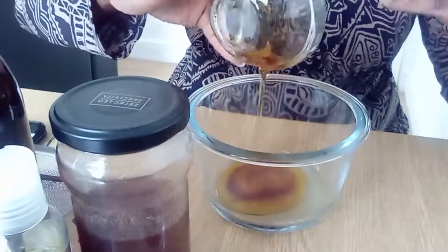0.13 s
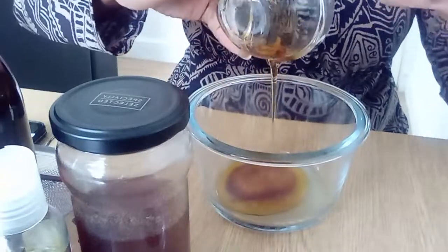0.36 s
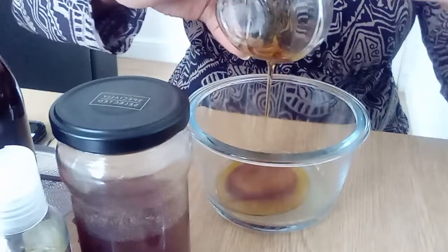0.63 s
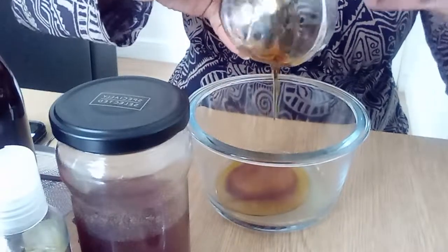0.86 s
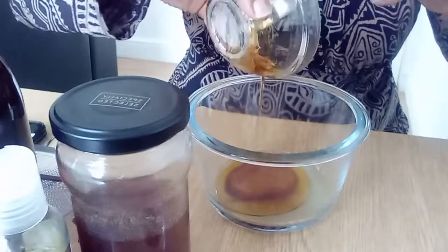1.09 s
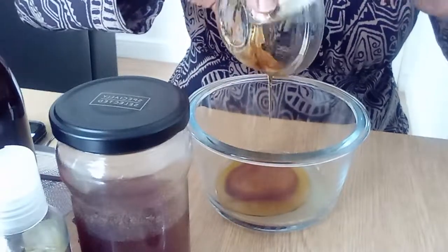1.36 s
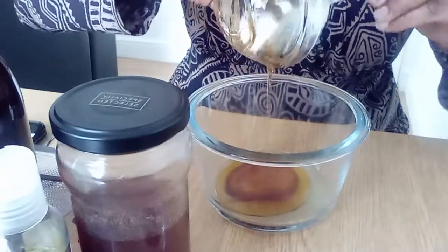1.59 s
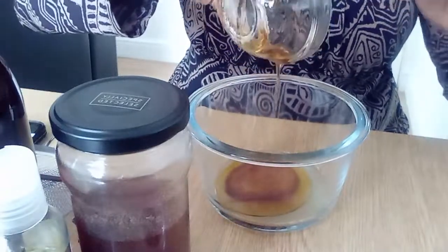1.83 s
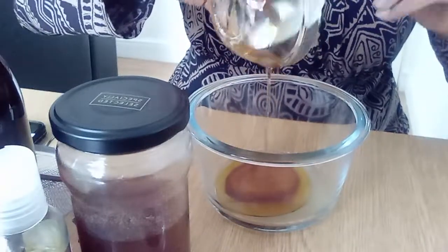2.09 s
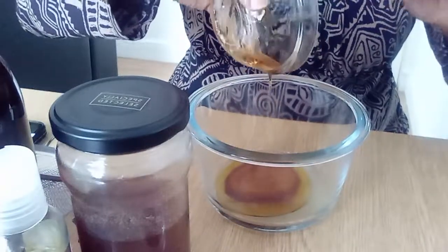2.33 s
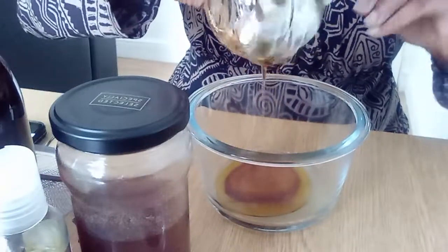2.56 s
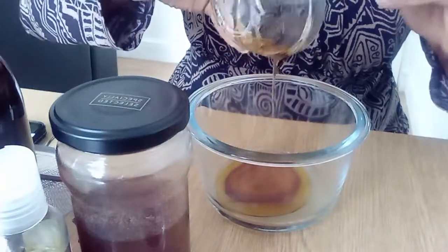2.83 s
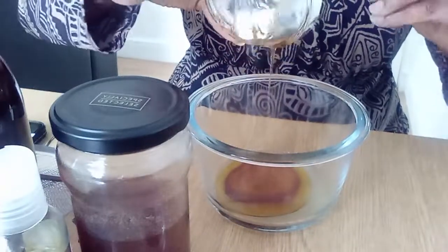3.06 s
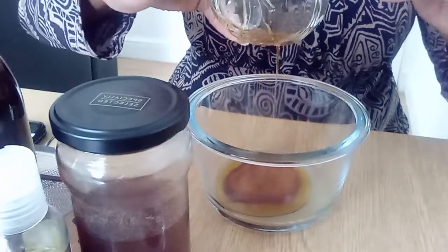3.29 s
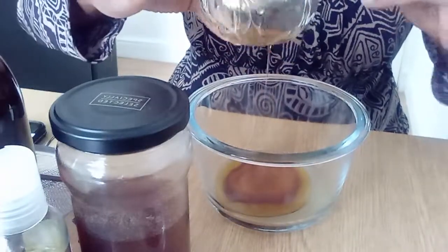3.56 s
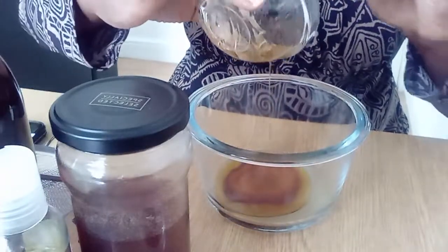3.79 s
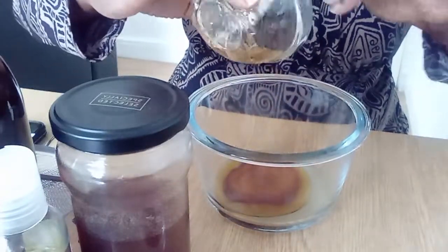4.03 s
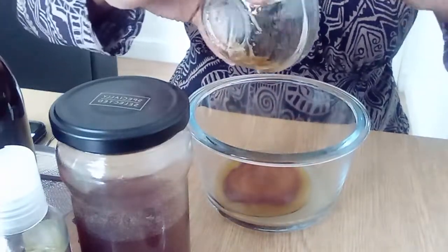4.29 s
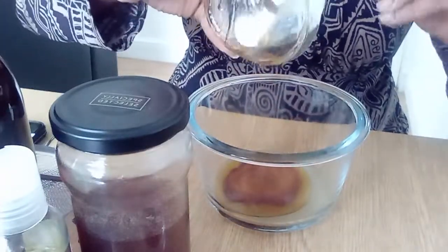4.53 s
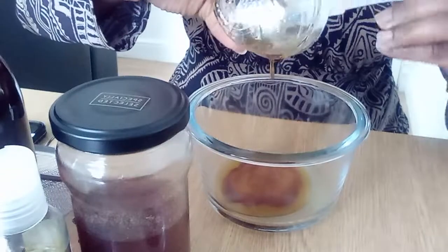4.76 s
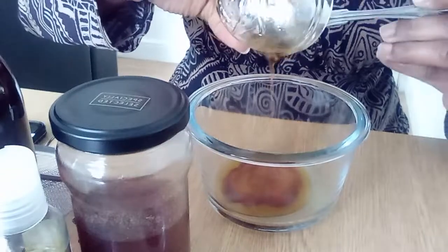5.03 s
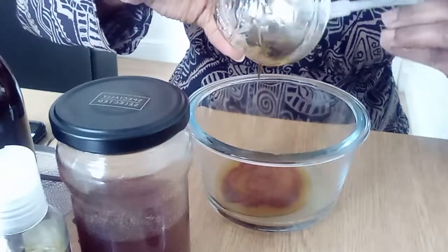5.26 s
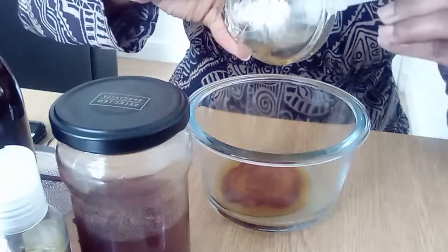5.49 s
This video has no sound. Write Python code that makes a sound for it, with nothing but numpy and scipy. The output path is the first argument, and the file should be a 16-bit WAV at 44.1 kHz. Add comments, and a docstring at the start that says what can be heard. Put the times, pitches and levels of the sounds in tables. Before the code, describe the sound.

A spoon scrapes thick oil from a small hand-held glass bowl with sharp, quickly damped ticks and brief gritty rubs, close and dry.

```python
"""In a quiet kitchen, a metal spoon scrapes thick oil out of a small hand-held glass bowl.
Contacts, single or in quick succession, excite damped modes of spoon and bowl and a short noise crack.
In the drags, uneven noise forces drive the same modes; hand and oil damp the ring quickly.
The room answers with a noise tail that decays by frequency, over soft hiss, low rumble and two drones."""
import sys
import numpy as np
from scipy import signal
from scipy.fft import rfft, irfft
from scipy.io import wavfile

SR = 44100
rng = np.random.default_rng(int(sys.argv[2]) if len(sys.argv) > 2 else 0)


def nominal_scale(level):
    """Amplitude ratio for a level in decibels (scalar or array-like)."""
    x = np.asarray(level, float) / 20
    return 10 ** x


def file_out(sig):
    """Save sig as 16-bit WAV at sys.argv[1]."""
    # one column per channel
    cols = np.atleast_2d(sig).T
    # limit, then scale
    lim = np.clip(cols, -1, 1)
    pcm = np.round(lim * 32767).astype(np.int16)
    wavfile.write(sys.argv[1], SR, pcm)


N = 248314  # samples

# Steady hiss. Each row: frequency in Hz, relative spectral density in dB.
HISS_SPECTRUM = [(250, -7.5), (450, 0.5), (900, -4), (1900, -8), (3600, -11), (5100, -19), (7600, -20),
                 (8500, -15), (9300, -21), (11000, -22.5), (15500, -22), (16300, -38.5)]
# Low rumble. Each row: frequency in Hz, relative spectral density in dB.
RUMBLE_SPECTRUM = [(15, -54), (25, -38.5), (36, -20.5), (60, -4), (130, 1), (300, -4.5), (450, -12),
                   (700, -57.5)]
# Narrow low drones. Each row: centre in Hz, width in Hz.
DRONES = [(75, 10), (131, 14)]
# Swells, one list per drone. Each row: middle in seconds, half length in seconds, rise in dB.
DRONE_SWELLS = [
    [(.01, .1, 17.5), (5.24, .12, 20), (5.55, .2, 16)],
    [(1.46, .18, 15.5), (5.4, .22, 15.5)],
]
HISS_DB, RUMBLE_DB = -73, -73
DRONE_DB = [-89, -87]  # between swells

# The hand shifts along the handle. Each row: start in seconds, pitch shift of the handle's modes in %.
GRIP = [(0, -2), (.125, -4), (.5, -3.5), (.62, -5), (1.05, -1), (1.77, 0), (2.15, 2), (2.7, 0.4),
        (3.15, 10), (3.55, -0.5), (4.15, 2.5), (4.75, 2), (5.3, 10), (5.48, 2)]
# Modes that bend the handle: lowest and highest frequency in Hz.
HANDLE_HZ = (4600, 5300)
# Modes of spoon and bowl. Each row: frequency in Hz, level in dB when struck by the spoon's tip, by its edge,
# by its back, t60 in seconds before a contact adds damping.
MODES = [(1084, -31.5, -6, -7.5, 0.037), (1360, -16.5, 5.5, -9.5, 0.021), (1854, -7.5, -2, 0.5, 0.033),
         (2009, 7.5, -10.5, -14, 0.045), (2296, -9.5, -3, -4, 0.034), (2420, 1.5, -26.5, 7, 0.038),
         (3346, -18.5, 4, -8, 0.033), (4237, -10, -16.5, -8.5, 0.035), (4440, -9.5, -2, -12, 0.023),
         (4800, 2, -6.5, -9, 0.05), (5006, 9.5, -10.5, 12, 0.028), (5280, -9, -7, -7, 0.023),
         (6300, -7, -9.5, -1.5, 0.016), (7000, -6, -10.5, -13, 0.023), (7500, -26.5, -20.5, -8, 0.081),
         (7720, -30.5, 4, -7, 0.028), (7973, -27, -5, -2, 0.034), (8315, -15, 0, -6, 0.058),
         (8525, 8, 4, -3, 0.023), (8570, -6.5, -9.5, -9, 0.034), (8807, 8, -2.5, -3.5, 0.043),
         (9160, -26, 6.5, -4, 0.026), (9480, -25.5, -9, -6.5, 0.046), (10800, -9.5, -19.5, -10, .04),
         (11580, -1.5, -2, -11.5, 0.013), (11280, -14, -16, -6, 0.018), (13200, -10.5, -4.5, -1, 0.043),
         (11950, -14.5, 4, -4.5, 0.011), (13600, -3.5, -11.5, -0.5, 0.011), (15300, -13, -17, -14, .03)]
# Bounds in Hz between the body, middle, upper and top regions of the modes.
REGIONS_HZ = (2900, 7000, 10200)
# Decay of the room. Each row: frequency in Hz, t60 in seconds.
KITCHEN_DECAY = [(500, 0.26), (2000, 0.32), (8000, 0.27), (15000, 0.24)]

# Contacts. Each row: start in seconds, level in dB, body modes in dB (a broad contact wakes them more),
# top modes in dB, place on the spoon (0 tip, 0.5 edge, 1 back).
CLINKS = [(0.069, -15.5, -17.5, -13, 0.063), (.157, -13.5, -15, -7, 0.6), (0.385, -44, -19, -5, 0.99),
          (0.4002, -49.5, 4.5, 0, .5), (.568, -13, -25.5, -20, 0.037), (0.646, -13, -17, -12.5, 0.63),
          (0.8478, -65, 26.5, -10, 0.57), (1.1275, -9.5, -25.5, -15.5, 0.039),
          (1.1734, -14.5, -18.5, -17, 0.19), (1.6977, -11.5, -29, -20, .055),
          (1.8198, -21.5, -7, -11, 0.83), (1.8422, -18.5, -26.5, -24, .11), (1.9574, -26.5, -12, -15, 0.51),
          (1.99, -29.5, -5.5, -13.5, 0.53), (2.2253, -10, -32, -28, .039), (2.241, -19, -40.5, -35, 0.029),
          (2.2621, -20, -42.5, -35.5, .04), (2.3317, -24.5, -15, -22, .77),
          (2.805, -12, -27.5, -36.5, 0.059), (2.819, -20, -25, -42, .044), (2.8342, -27.5, -5, -9, 0.87),
          (2.8505, -20, -25.5, -46, 0.064), (2.9198, -26, -10.5, -12, 0.15),
          (3.0515, -47.5, -6, -14, 0.087), (3.2504, -19, -9, -4.5, 0.63), (3.634, -14.5, -21, -7.5, 0.02),
          (3.68, -34, -15, -35, 0.11), (3.6934, -28.5, -10.5, -22, 0.23), (3.9823, -63, 21, -10, 0.62),
          (4.2848, -15.5, -14, -10, 0.066), (4.3428, -19, -10.5, -17.5, 0.39),
          (4.511, -34, -5.5, -17.5, 0.41), (4.5219, -42, -4.5, -25, 0.093), (4.8382, -55, -4, -26.5, 0.27),
          (4.8882, -53.5, -9, -18, 0.35), (4.951, -41, -1, -16, 0.25), (5.1004, -48, -1, -21, 0.41),
          (5.444, -19.5, -11, -11.5, 0.9), (5.5179, -15.5, -15.5, -15, 0.93)]
# Noise of a contact before shading. Each row: frequency in Hz, relative spectral density in dB.
CRACK_SPECTRUM = [(290, -67), (500, -32.5), (1640, -20), (2770, -18.5), (3300, -26), (3880, -22.5),
                  (6960, -17.5), (8540, -11.5), (10300, -16.5), (12500, -21), (16500, -44)]
# The middle modes follow the body part of the way: offset in dB, share of the body's dB.
CLINK_MIDDLE_DB, CLINK_MIDDLE_FOLLOWS = 2.5, 0.65

# Drags over the glass. Each row: start in seconds, length in seconds, rasp in dB, body relative to it in dB,
# place on the spoon (0 tip, 0.5 edge, 1 back).
DRAGS = [(.11, .045, -59, -3, .27), (0.189, .1, -39, -35, 0.29), (.295, 0.12, -57, -1.5, 0.47),
         (0.699, 0.072, -46, -21, .4), (.755, 0.12, -59, 1, .4), (1.2, 0.055, -42, -20, .31),
         (1.285, 0.052, -55, -11, .31), (1.936, 0.048, -43, -11, .23), (2.232, .098, -24.5, -45.5, .03),
         (2.35, .08, -48, -27, .03), (2.459, 0.065, -58.5, -14.5, 0.32), (2.926, 0.1, -51.5, -5, .43),
         (3.3, 0.1, -61, -2, .62), (3.395, 0.04, -55, -8, 0.76), (3.7, 0.13, -54.5, -19.5, 0.21),
         (3.844, 0.058, -67.5, 0, .31), (3.989, 0.035, -76, 6, .56), (4.41, 0.14, -56.5, -9.5, .5),
         (4.63, 0.034, -70.5, -4.5, .1), (4.705, 0.021, -62.5, -30, .22), (4.814, .04, -65.5, -21, .65),
         (4.896, 0.046, -68.5, -25, .65), (4.958, 0.054, -60, -11, .4), (5.045, 0.074, -60.5, -11, .4),
         (5.529, 0.026, -44.5, -12, .73)]
# Bare grit of steel on glass. Each row: frequency in Hz, relative spectral density in dB.
GRIT_SPECTRUM = [(1200, -27), (2500, -6), (5000, -1), (7000, 4.5), (9500, -15), (13000, -25.5)]
GRIT_DB = -20  # under the rasp
DRAG_MIDDLE_DB, DRAG_MIDDLE_FOLLOWS = -3.5, 0.56
# Oil gathers before the spoon and dulls the rasp first (dB per second).
RASP_FADE_DB_S, RUB_FADE_DB_S = 59.5, 21.5
ROLL, SLIDE = -0.15, 0.023  # over a drag: change of place, share of pitch of body and middle modes
# The rasp rises at once, the lower rub as the spoon seats itself (seconds).
PRESS_S, SEAT_S, LIFT_S = 0.0066, 0.023, 0.011


def unit(x):
    """Normalisation to unit rms."""
    return x / np.sqrt(np.mean(x ** 2) + 1e-20)


def along(points, hz):
    """Interpolation of (Hz, value) points on a logarithmic frequency axis."""
    f, v = np.transpose(points)
    return np.interp(np.log(hz + 1), np.log(f + 1), v)


def coloured(spectrum, size):
    """Spectral shaping: white noise weighted by a spectrum, at rms 1."""
    z = rfft(rng.standard_normal(size))
    hz = np.fft.rfftfreq(size, 1 / SR)
    return unit(irfft(z * nominal_scale(along(spectrum, hz)), size))


def room_tone():
    """Superposition of stationary noise: hiss, rumble and two narrow bands whose levels swell."""
    t = np.arange(N) / SR
    low = nominal_scale(RUMBLE_DB) * coloured(RUMBLE_SPECTRUM, N)
    for (hz, width), db, swells in zip(DRONES, DRONE_DB, DRONE_SWELLS):
        shape = [(hz - 3 * width, -50), (hz - width / 2, -3), (hz, 0),
                 (hz + width / 2, -3), (hz + 3 * width, -50)]
        rise_db = sum(rise * np.exp(-((t - s) / half) ** 2) for s, half, rise in swells)
        low += nominal_scale(db + rise_db) * coloured(shape, N)
    return nominal_scale(HISS_DB) * coloured(HISS_SPECTRUM, N) + low


def regrip(s, hz):
    """Boundary conditions tune modes: the grip shifts the handle's, oil and fingers scatter all a little."""
    since, percent = np.transpose(GRIP)
    handle = (hz > HANDLE_HZ[0]) & (hz < HANDLE_HZ[1])
    scatter = 0.006 * rng.standard_normal(len(hz))
    held = max(np.searchsorted(since, s) - 1, 0)
    return 1 + scatter + handle * percent[held] / 100


def ringing(gains, phase, detune, damping):
    """Modal superposition: a sum of exponentially decaying sines after one blow."""
    hz, t60 = np.transpose(MODES)[[0, 4]]
    t = np.arange(SR // 8)[:, None] / SR
    rise = 1 - np.exp(-t / 0.0008)
    decay = nominal_scale(-60 * damping * t / t60)
    return (decay * rise * np.sin(2 * np.pi * hz * detune * t + phase)) @ gains


def touching(place):
    """Point of excitation: the shares of the spoon's tip, edge and back in a contact."""
    distance = np.abs(2 * np.clip(place, 0, 1) - np.arange(3)[:, None])
    return np.clip(1 - distance, 0, 1)


def kitchen(x):
    """Diffuse reverberation: convolution with a fresh noise tail that decays at a rate set by frequency."""
    hz, t, z = signal.stft(rng.standard_normal(SR // 2), SR, nperseg=128)
    decay = nominal_scale(-60 * t / along(KITCHEN_DECAY, hz)[:, None])
    tail = signal.istft(z * decay, SR, nperseg=128)[1]
    tail *= 1 - np.exp(-np.arange(len(tail)) / SR / 0.011)  # reflections build up
    return signal.fftconvolve(x, tail / np.linalg.norm(tail))


def clinks():
    """Impact excitation: each contact cracks and rings the modes selected by the place struck."""
    out = np.zeros(N + SR)
    hz, *struck_db, _ = np.transpose(MODES)
    t = np.arange(SR // 8) / SR
    oil = np.where(hz < REGIONS_HZ[1], 1.5, 1)  # the oil film muffles the lower modes
    crack_envelope = nominal_scale(-60 * t / 0.053) * (1 - np.exp(-t / 0.0005))
    for s, db, body_db, top_db, place in CLINKS:
        middle_db = CLINK_MIDDLE_DB + CLINK_MIDDLE_FOLLOWS * body_db
        region_db = np.array([body_db, middle_db, 0, top_db])
        place_db = touching(place)[:, 0] @ struck_db
        mode_db = place_db + region_db[np.searchsorted(REGIONS_HZ, hz)] + rng.normal(0, 2.2, len(hz))
        phase = rng.uniform(0, 2 * np.pi, len(hz))
        blow = ringing(nominal_scale(mode_db - 10), phase, regrip(s, hz), oil)
        # the crack takes most of the same balance between regions
        shade = [(f, level + 0.8 * region_db[np.searchsorted(REGIONS_HZ, f)])
                 for f, level in CRACK_SPECTRUM]
        blow += crack_envelope * nominal_scale(-13) * coloured(shade, len(t))
        at, echo = round(s * SR), kitchen(blow)
        out[at:][:len(t)] += nominal_scale(db) * blow
        out[at:][:len(echo)] += nominal_scale(db - 7) * echo
    return out[:N]


def drag():
    """Friction excitation: stuttering noise forces drive the modes, which shift as the spoon rolls."""
    hz, *struck_db, _ = np.transpose(MODES)
    region, out = np.searchsorted(REGIONS_HZ, hz), np.zeros(N + SR)
    # pressed on the glass, the spoon loses its middle and highest ring soonest
    pressed = np.array([1.2, 1.7, 1, 2.6])[region]
    rise_s = np.array([[PRESS_S], [SEAT_S], [SEAT_S]])
    for s, length, db, body_db, place in DRAGS:
        t = np.arange(0, max(length, 0.01), 1 / SR)
        top = nominal_scale(touching(place)[:, 0] @ [-28, -17, -15])  # the tip hardly stirs the highest modes
        # three forces: rasp on upper and top modes, rub on body modes, rub on middle modes
        groups = np.transpose([(region == 2) + top * (region == 3), region == 0, region == 1])
        steps = nominal_scale(3 * rng.standard_normal((3, SR // 512)))
        stutter = steps.repeat(256, axis=1)[:, :len(t)]
        rub_db = db - RUB_FADE_DB_S * t
        middle_db = DRAG_MIDDLE_DB + DRAG_MIDDLE_FOLLOWS * body_db
        levels = [db - RASP_FADE_DB_S * t, rub_db + body_db, rub_db + middle_db]
        pressure = nominal_scale(levels) * np.clip(np.minimum(t / rise_s, (length - t) / LIFT_S), 0, 1)
        # crossfade from the modes at the start to those after the roll
        sound, turn = 0, np.pi / 2 * t / t[-1]
        for share, moved in (np.cos(turn), 0), (np.sin(turn), 1):
            detune = regrip(s, hz) + moved * SLIDE * (region < 2)
            gains = groups * nominal_scale(touching(place + moved * ROLL).T @ struck_db).T
            bodies = ringing(gains, 0, detune, pressed).T
            bodies = bodies / np.linalg.norm(bodies, axis=1, keepdims=True)
            force = share * pressure * stutter * rng.standard_normal((3, SR // 4))[:, :len(t)]
            sound = sound + signal.fftconvolve(force, bodies, axes=1).sum(axis=0)
        grit = coloured(GRIT_SPECTRUM, SR // 4)[:len(t)]
        sound[:len(t)] += nominal_scale(GRIT_DB) * (pressure * stutter)[0] * grit
        at, echo = round(s * SR), kitchen(sound)
        out[at:][:len(sound)] += nominal_scale(-2.5) * sound
        out[at:][:len(echo)] += nominal_scale(-10) * echo
    return out[:N]


def scene():
    """Linear superposition of room tone, contacts and drags in one channel."""
    return (room_tone() + clinks() + drag())[None]


def top_cut(x):
    """Nothing passes above the cut-off."""
    return signal.sosfilt(signal.butter(12, 16710, fs=SR, output="sos"), x)


def record(dry):
    """Direct pickup: the mix passes on with no further gain, only losing the treble above the recorder's cut-
    off."""
    return top_cut(dry)


dry = scene()
out = record(dry)
file_out(out)
```